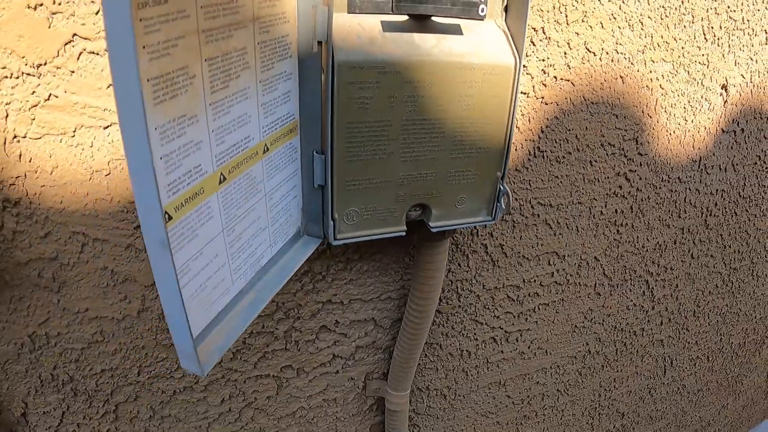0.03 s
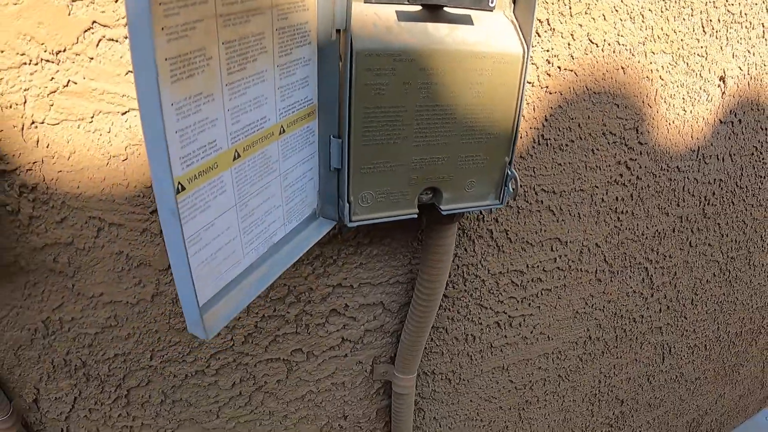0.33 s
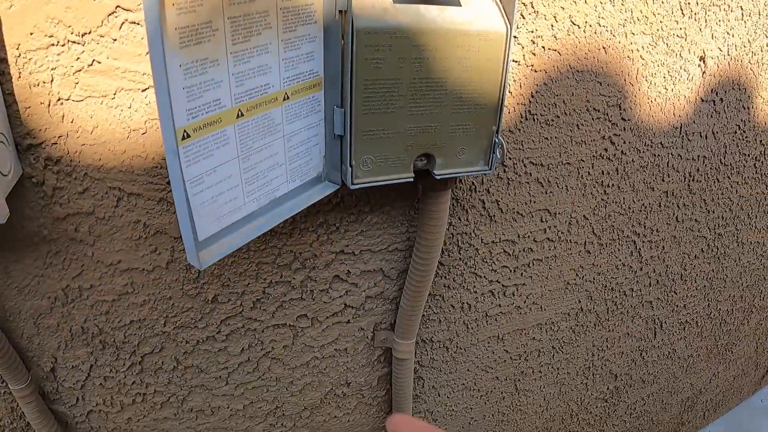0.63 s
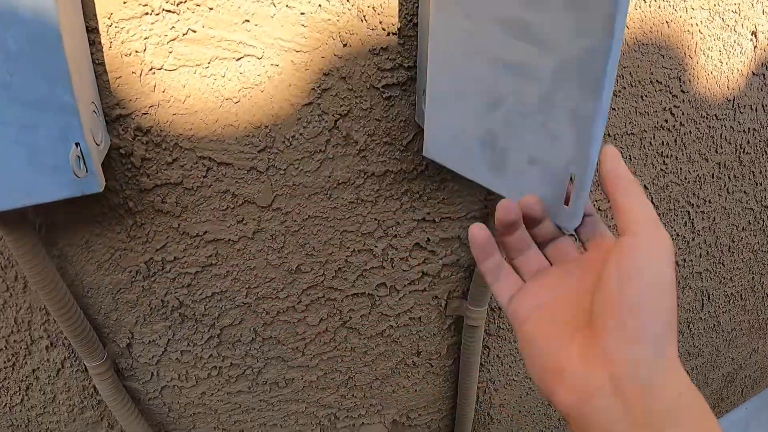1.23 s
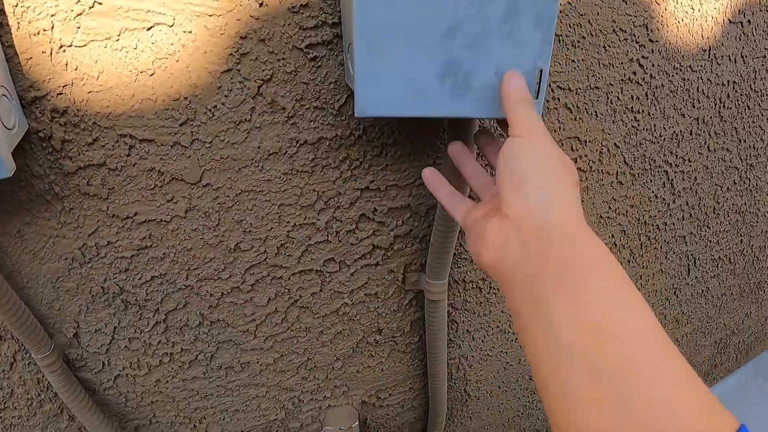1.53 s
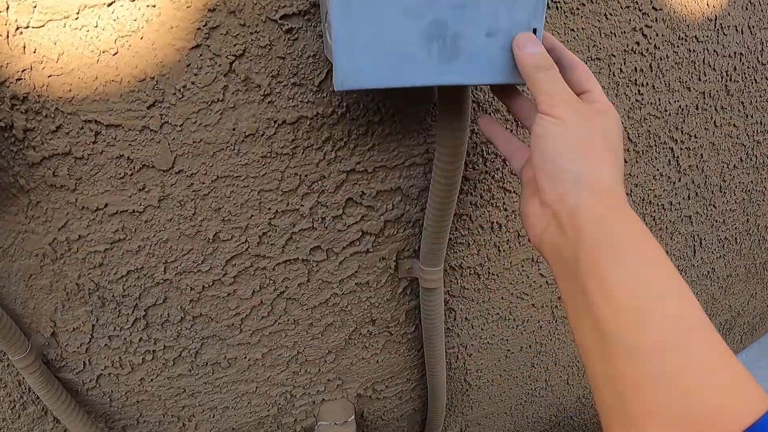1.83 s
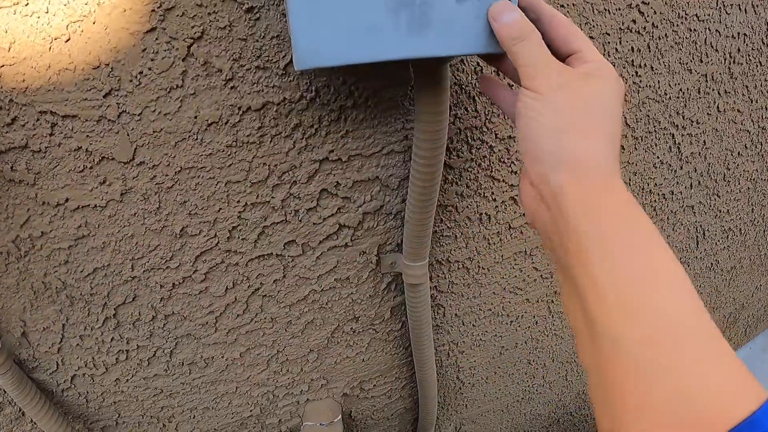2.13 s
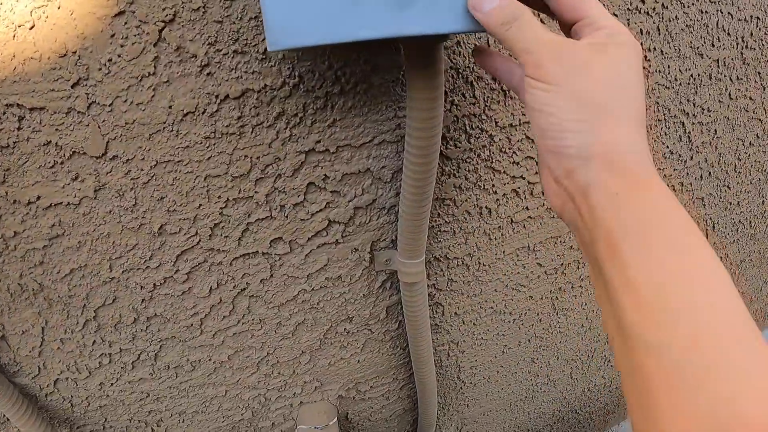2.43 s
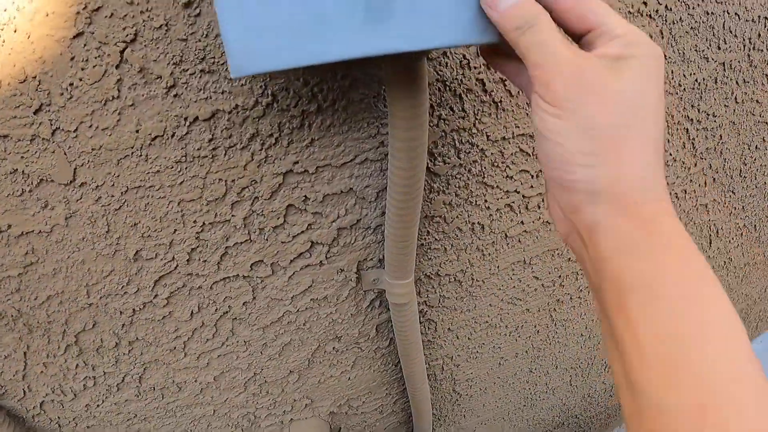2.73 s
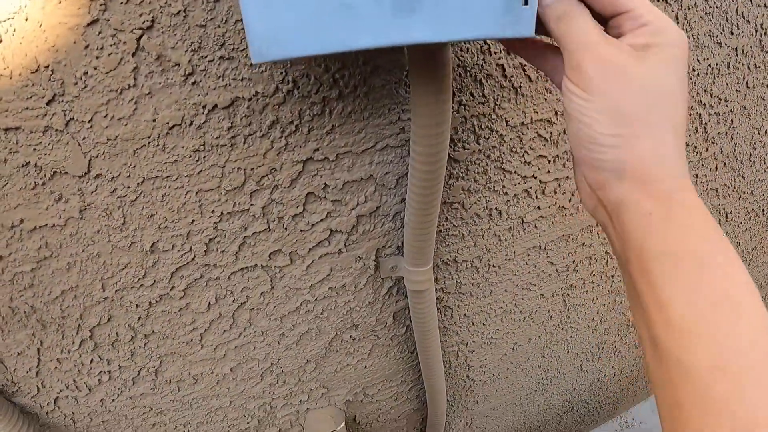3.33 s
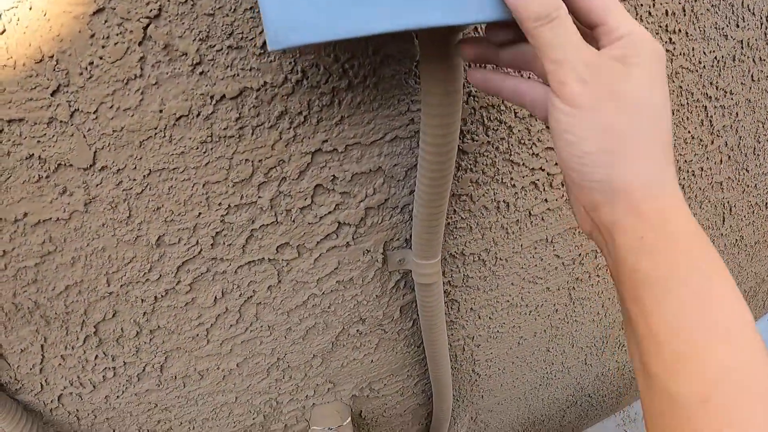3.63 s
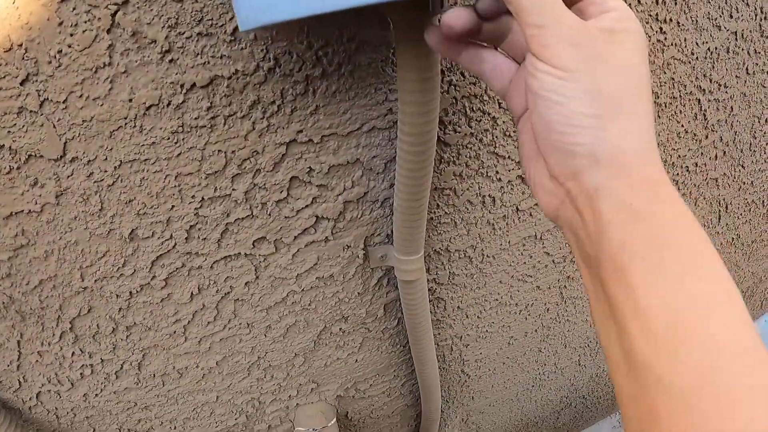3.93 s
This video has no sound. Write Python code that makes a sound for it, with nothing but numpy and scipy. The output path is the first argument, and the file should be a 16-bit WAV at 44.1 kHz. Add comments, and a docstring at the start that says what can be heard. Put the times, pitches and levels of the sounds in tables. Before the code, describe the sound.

A sheet-metal cover is pressed shut on an outdoor wall box, knocking, rubbing and ringing briefly before the latch snaps home. A nearby compressor hums under its rushing fan throughout, and light gusts buffet the microphone early on.

```python
"""A compressor motor close by comes up to speed with one sag, humming under the rush of its fan.
In the first two seconds light gusts buffet the microphone and a hand brushes a sheet-metal cover.
From 2.2 s the cover is pressed shut on its outdoor wall box: it knocks on the rim, rubs and rings.
Near 3.7 s the latch snaps home; one more knock follows while the machine runs on."""
import sys
import numpy as np
from scipy import signal
from scipy.fft import irfft
from scipy.io import wavfile
from scipy.ndimage import uniform_filter1d

SR = 44100
rng = np.random.default_rng(int(sys.argv[2]) if len(sys.argv) > 2 else 0)


def digitize_waveform(pressure):
    """Quantize a signal to 16-bit integers and store it at the path in sys.argv[1].

    Rows of a 2-D input are taken as channels; values are limited to [-1, 1].
    """
    field = np.atleast_2d(pressure).T
    bounded = np.clip(field, -1, 1)
    quanta = np.round(bounded * 32767).astype(np.int16)
    wavfile.write(sys.argv[1], SR, quanta)


N = 176400
TIME = np.arange(N) / SR


def amp(db):
    """Decibels to gain."""
    return 10 ** (np.asarray(db) / 20)


def unit(x):
    """Scales to rms 1."""
    return x / np.sqrt(np.mean(x ** 2) + 1e-20)


def eq_db(points, hz):
    """An EQ curve's level, read on a log-frequency axis."""
    f, db = np.transpose(points)
    return np.interp(np.log(hz + 1), np.log(f), db)


def curve(table, column=1):
    """One column of a time table at every sample."""
    table = np.array(table)
    return np.interp(TIME, table[:, 0], table[:, column])


def add(mix, start, sound):
    """Mixes a sound in at a time in seconds."""
    part = mix[max(round(start * SR), 0):][:len(sound)]
    part += sound[:len(part)]


def noise(gain, size=N):
    """Noise of rms 1 with the spectrum gain(hz)."""
    hz = np.fft.rfftfreq(size, 1 / SR) + 1
    phases = np.exp(2j * np.pi * rng.random(len(hz)))
    return unit(irfft(gain(hz) * phases, size))


def drift(rate_hz):
    """Random wander of rms 1, up to about the given rate."""
    return noise(lambda f: np.exp(-((f - 1) / rate_hz) ** 2))


def flicker(depth_db, rate_hz):
    """A gain that wanders around 1."""
    return amp(depth_db * drift(rate_hz))


def bell(hz, centre_hz, octaves):
    """A smooth bump on a log-frequency axis."""
    return np.exp(-.5 * (np.log2(hz / centre_hz) / octaves) ** 2)


def fade(t, t60):
    """Free decay, 60 dB down after t60 seconds."""
    return np.exp(-np.log(1000) * t / t60)


def arch(start, length):
    """A swell that rises and falls once."""
    return np.sin(np.pi * np.clip((TIME - start) / length, 0, 1))


def wind():
    """Gusts buffet the microphone with a lumpy low rumble."""
    # The gusts. Each row: start in seconds, length in seconds, level in dB, upper edge in Hz.
    gusts = [(0.23, 0.44, -19.5, 370), (0.578, 0.04, -14, 380), (0.645, 0.34, -16.5, 69),
             (1.784, 0.24, -21, 45.2)]
    out = np.zeros(N)
    for start, length, db, edge_hz in gusts:
        rumble = noise(lambda f: f / np.hypot(f, 25) / np.hypot(1, (f / edge_hz) ** 4.9))
        out += amp(db) * arch(start, length) * unit(rumble / flicker(depth_db=1, rate_hz=30))
    return out


def fan():
    """The fan's moving air: a low rush and a thin hiss, both slightly restless."""
    # Tone colours of the rush and the hiss. Each row: frequency in Hz, relative level in dB.
    rush_eq = [(15, -6), (30, 1), (90, 4), (170, 3.5), (270, -3), (500, -4.5), (620, -6.5), (740, -6),
               (980, -13), (1350, -14.5), (2000, -22.5), (3000, -27.5), (4500, -38.5), (8000, -60.5),
               (15000, -89)]
    hiss_eq = [(1000, -27.5), (2500, -1.5), (4000, 0), (6300, -5.5), (8000, -13), (10000, -22.5),
               (12500, -32), (15500, -53.5)]
    # The airflow's swells. Each row: time in seconds, rush level in dB, hiss level in dB.
    levels = [(0, -23.5, -50), (.13, -23, -52), (.32, -17, -47), (.5, -18, -51), (.76, -20, -50),
              (1.05, -19.5, -48), (1.3, -17, -45.5), (1.65, -17.5, -49), (2.05, -19.5, -49),
              (2.5, -19, -49.5), (3.0, -22, -53), (3.55, -21, -52), (3.9, -20.5, -49.5), (4, -21, -58)]
    rush = noise(lambda f: amp(eq_db(rush_eq, f))) * amp(curve(levels))
    hiss = noise(lambda f: amp(eq_db(hiss_eq, f))) * amp(curve(levels, column=2))
    # Small patches of time and frequency swell and sink by about half a dB.
    frames = signal.stft(rush + hiss, nperseg=512)[2].T
    patches = uniform_filter1d(rng.standard_normal(frames.shape), size=10, axis=0)
    patches = unit(uniform_filter1d(patches, size=7, axis=1))
    air = signal.istft((frames * amp(.5 * patches)).T, nperseg=512)[1][:N]
    return air * flicker(depth_db=1, rate_hz=46)


def tone(cycles):
    """A gently fluttering sine of rms about 1 that follows a running count of cycles."""
    sine = np.sqrt(2) * np.sin(2 * np.pi * (cycles + rng.random()))
    return sine * flicker(depth_db=.66, rate_hz=6.3)


def motor():
    """The compressor's shaft harmonics follow its speed and beat against the mains hum."""
    # The run-up. Each row: time in seconds, shaft speed in turns per second.
    speed = [(0, 45.4), (.15, 51), (.3, 57.7), (.5, 46), (.9, 57), (4, 59.1)]
    # Shaft overtones. Each row: multiple of the speed, level in dB before the gain rides.
    overtones = [(2, -25), (3, -26), (4, -31.5), (5, -46.5), (6, -34.5), (8, -40), (12, -39.5), (13, -41.5)]
    # Gain rides on the hum. Each row: time in seconds, level of the fundamental in dB,
    # gain of the second harmonic in dB, gain of the higher ones in dB.
    rides = [(0, -25, 3, -2.5), (.4, -18, 5.5, -2), (.75, -23.5, -6, -13), (1.3, -35.5, -8, 1.5),
             (1.6, -19, 3.5, 1), (2.15, -26, -1.5, -1), (2.5, -17.5, -1, -0.5), (2.9, -23.5, -3, -4.5),
             (3.5, -21.5, -0.5, 0), (4, -27.5, -1.5, -5.5)]
    # Mains hum and fan blade tone. Each row: frequency in Hz, level in dB.
    steady_tones = [(120, -28), (129.5, -33), (240, -35.5)]
    waver = 1 + .0037 * drift(rate_hz=4.7)
    turns = np.cumsum(curve(speed) * waver) / SR
    out = amp(curve(rides)) * tone(turns)
    for multiple, db in overtones:
        ride_db = curve(rides, column=2 if multiple == 2 else 3)
        out += amp(db + ride_db) * tone(multiple * turns)
    return out + sum(amp(db) * tone(hz * TIME) for hz, db in steady_tones)


def grainy_swells():
    """Short swells of bright, grainy noise around the knocks, and a soft rustle near the microphone."""
    # The swells and the rustle. Each row: start in seconds, length in seconds, level in dB,
    # centre in Hz, width in octaves. The one at 2.744 s is a brief swell of bright noise leading
    # into the knock at 2.76 s; the other swells are skin and rim rubbing on the metal.
    swells = [(0.517, 0.083, -40, 2500, 0.64), (0.661, 0.06, -38.5, 2600, 0.56),
              (1.847, 0.081, -39.5, 2840, 0.45), (2.744, 0.046, -29.5, 2705, 0.5),
              (3.049, 0.09, -44.5, 3230, 0.13), (3.175, 0.15, -40, 2840, .18),
              (3.35, 0.081, -34.5, 3230, 0.25), (3.38, 0.086, -58, 7900, .35),
              (3.67, 0.054, -25.5, 2660, 0.64)]
    rustle = (.17, .18, -69, 9500, .35)
    grain = flicker(depth_db=2, rate_hz=310)
    out = np.zeros(N)
    for start, length, db, hz, octaves in swells + [rustle]:
        band = noise(lambda f: bell(f, hz, octaves))
        out += amp(db) * arch(start, length) * unit(band * grain)
    return out


def ring(modes, t, beat_hz=25, beat_depth=.25):
    """Struck metal rings in decaying modes that waver as the loose parts shift."""
    onset_rms = np.sqrt(sum(amp(db) ** 2 for _, db, _ in modes) / 2)
    out = 0
    for hz, db, t60 in modes:
        phase, beat_phase, beat_spread = rng.random(3)
        beat = 1 + beat_depth * np.sin(2 * np.pi * (beat_hz * (.5 + beat_spread) * t + beat_phase))
        out = out + amp(db) * fade(t, t60) * beat * np.sin(2 * np.pi * (hz * t + phase))
    return out / onset_rms


def clack(level_db, tilt_db, knock_db, knock_hz, cover_db, latch_db, size=16384):
    """One contact: sheet clatter, its duller wall echo, a dead knock, and cover and latch ringing on."""
    # Tone colour of the sheet's dense clatter. Each row: frequency in Hz, relative level in dB.
    clatter_eq = [(100, -23), (500, 5.5), (750, 3.5), (1000, 9.5), (1400, 11), (3000, -9.5), (5000, -13.5),
                  (7500, -26), (10500, -36.5), (12500, -38), (15500, -59)]
    # Modes of cover and latch. Each row: frequency in Hz, relative level in dB, t60 in seconds.
    cover_modes = [(738, 7, 0.17), (974, -5, 0.2), (1185, -2, 0.22), (1303, -2, 0.2), (1690, 2, 0.1),
                   (2355, 2.5, 0.1), (2490, 0, .1), (2630, -2, 0.09), (2920, -.5, .09), (3310, -4, 0.1),
                   (3595, -4, 0.14), (4075, -9, 0.11), (4680, -13, 0.13)]
    latch_modes = [(1455, -1, 0.25), (1793, -6, 0.3), (1986, 1.5, 0.28), (2487, 2.5, .23), (2568, -1, .17),
                   (2935, -5, .2), (3040, 1.5, 0.28), (3575, -7, 0.16), (3752, -17, .35), (4834, -12, 0.17),
                   (5305, -6.5, .13), (6150, -17, .1), (11700, -36, 0.11)]
    attack_s, wall_db, wall_edge_hz = .0022, -13, 8900
    t = np.arange(size) / SR
    colour = lambda f: amp(eq_db(clatter_eq, f) + tilt_db * np.log2(f / 2000))
    clatter = noise(colour, size) * fade(t, t60=.1)
    echo = noise(lambda f: colour(f) / np.hypot(1, f / wall_edge_hz), size) * fade(t, t60=.22)
    knock_decay = fade(t, t60=.029 * np.sqrt(1000 / knock_hz))  # lower knocks last longer
    knock_band = noise(lambda f: bell(f, knock_hz, octaves=.23), size)
    knock = unit(knock_band * knock_decay) * np.sqrt(np.mean(knock_decay ** 2))
    ringing = amp(cover_db) * ring(cover_modes, t) + amp(latch_db) * ring(latch_modes, t)
    body = clatter + amp(wall_db) * echo + amp(knock_db) * knock + ringing
    return amp(level_db) * np.minimum(t / attack_s, 1) * body


def cover():
    """The cover hits the rim in quick clusters of contacts as it is pressed home."""
    # The contacts. Each row: start in seconds, level in dB, clatter tilt in dB per octave, knock in dB,
    # knock pitch in Hz, cover ring in dB, latch ring in dB. Knock and rings are relative to the clatter.
    contacts = [(2.234, -25, -1, 11, 2338, -11, -23), (2.235, -22, -2.5, 9.5, 737.5, -5, -27),
                (2.237, -28, 0, 10, 1460, -10, -22), (2.243, -29, 5, 4, 2200, -8, -25),
                (2.761, -15.5, 0.5, 0, 1740, -0.5, -24), (2.764, -27, 2, 17, 210.6, -6, -20),
                (2.770, -25, 3, 11, 730, 0, -20), (2.780, -21, -3, 3, 1300, -4, -22),
                (2.785, -22.5, 1.5, 12, 2650, -0.5, -13), (2.784, -31, 0, 19, 190, -8, -20),
                (2.91, -28, -10, 11.5, 1480, -4.5, -5.5), (3.363, -21, 1.5, 13, 640, -3, -16.5),
                (3.367, -29, 0, 12, 1253, -3, -2), (3.399, -26, 0, 5, 1292, -12, -11),
                (3.415, -31.5, 5, 12, 694.3, -4, -14), (3.444, -33, 2, 8, 1300, -10, -23),
                (3.681, -22, 5, 3, 2500, -16, -8.5), (3.686, -18.5, 1.5, -3, 1820, 1, -12),
                (3.689, -25, 2, 12.5, 710, -2, -2), (3.703, -28, 5.5, 12, 397, -4, 3.5),
                (3.829, -27.5, 4.5, 19.5, 463, 0, -20), (3.831, -32, 1, 13, 1350, -6, -14)]
    out = np.zeros(N)
    for start, *blow in contacts:
        add(out, start, clack(*blow))
    return out


def scene():
    """The cover in front of the running machine and the wind, in mono."""
    return (cover() + grainy_swells() + motor() + fan() + wind())[None]


def record(dry, ceiling=.85, edge_hz=15600):
    """A soft clip rounds off the highest peaks, then a low-pass trims the very top."""
    rounded = dry / (1 + (dry / ceiling) ** 8) ** (1 / 8)
    low_pass = signal.firwin(511, edge_hz, window=("kaiser", 9), fs=SR)
    return signal.oaconvolve(rounded, low_pass[None], "same")


dry = scene()
out = record(dry)
digitize_waveform(out)
```